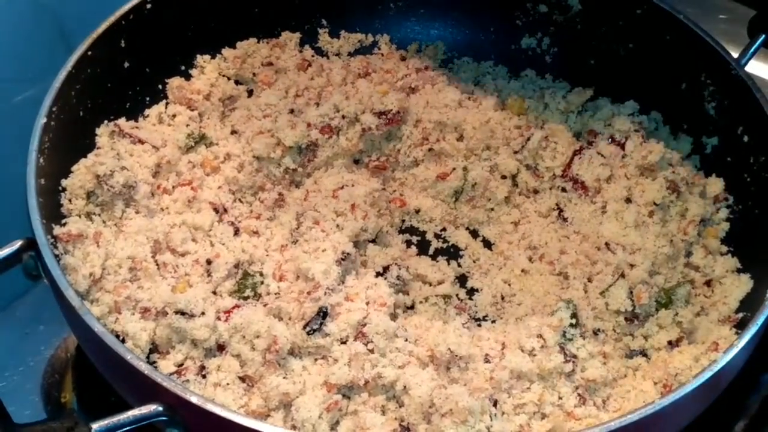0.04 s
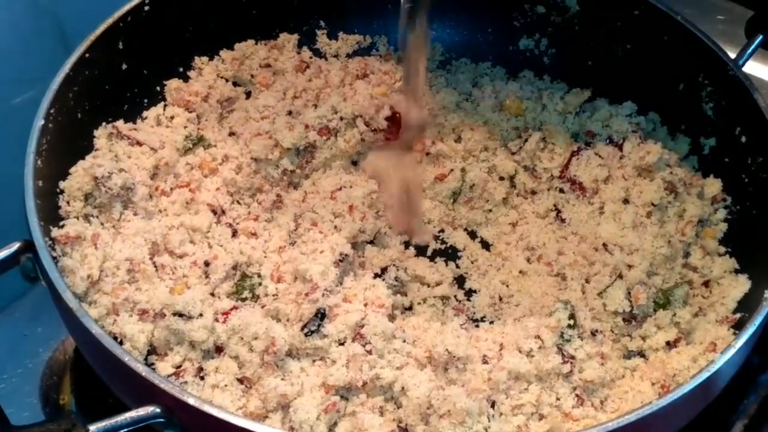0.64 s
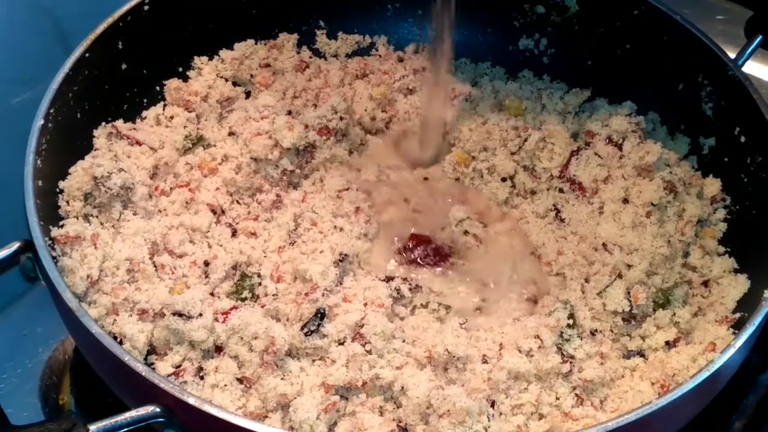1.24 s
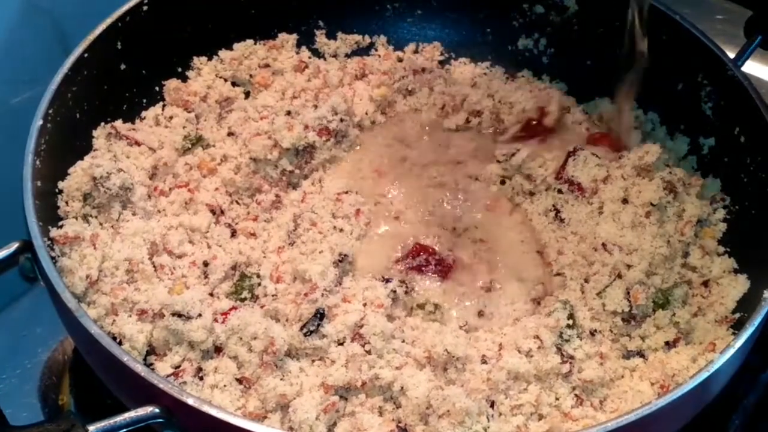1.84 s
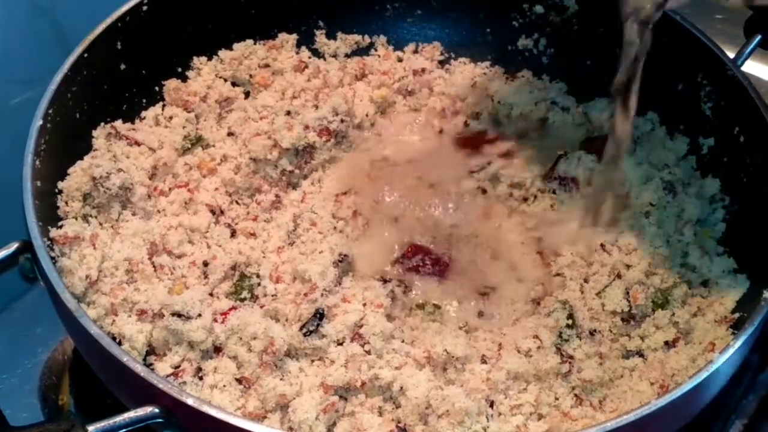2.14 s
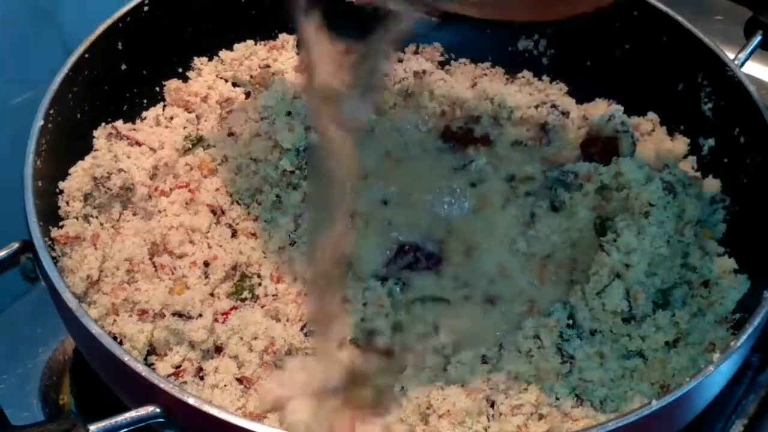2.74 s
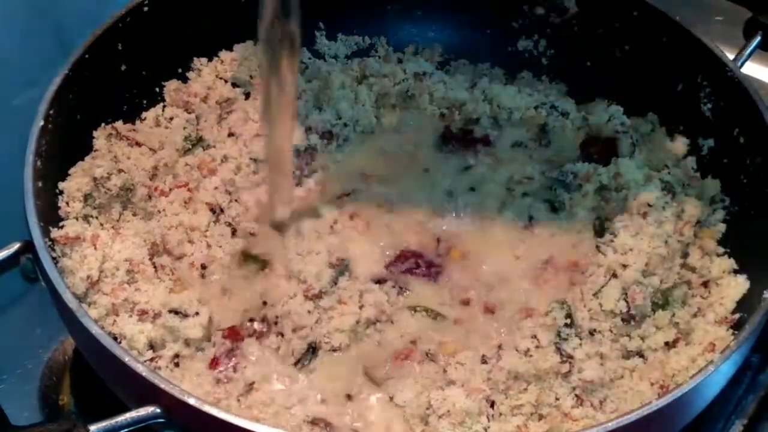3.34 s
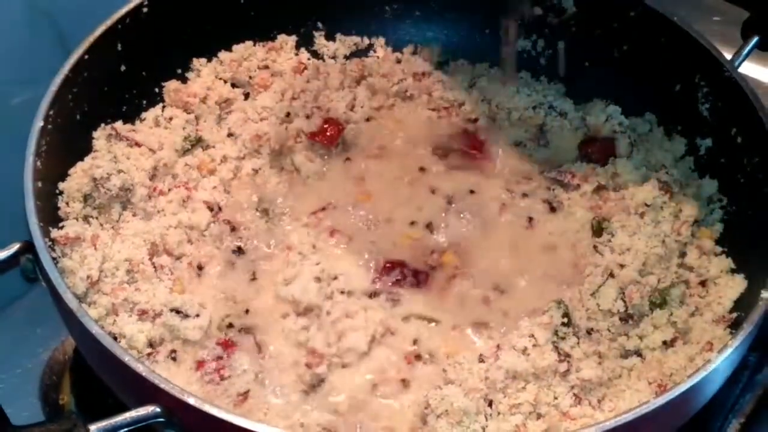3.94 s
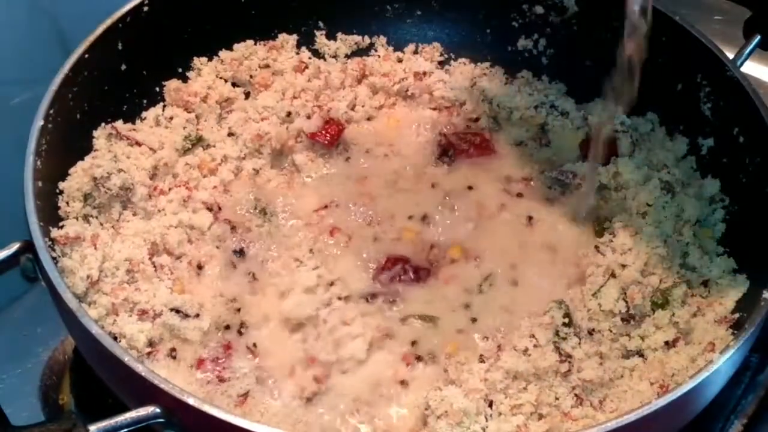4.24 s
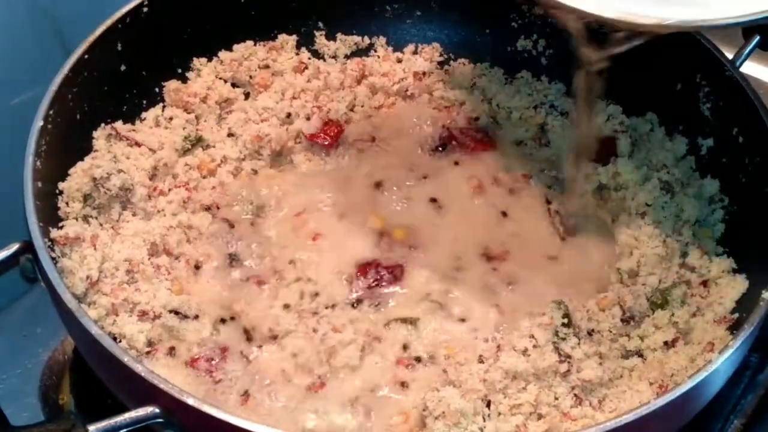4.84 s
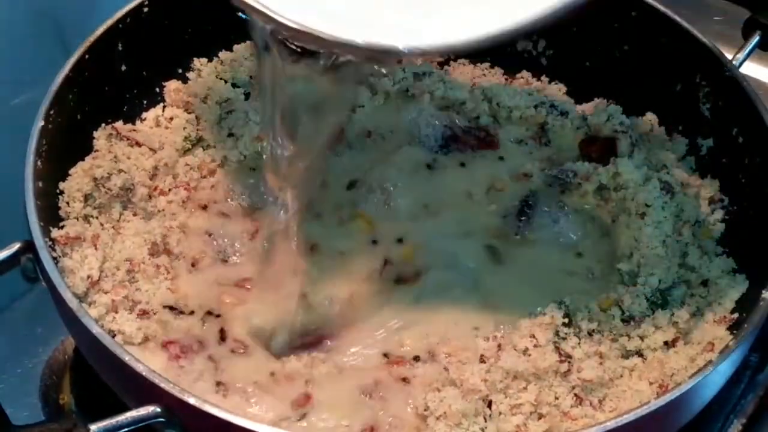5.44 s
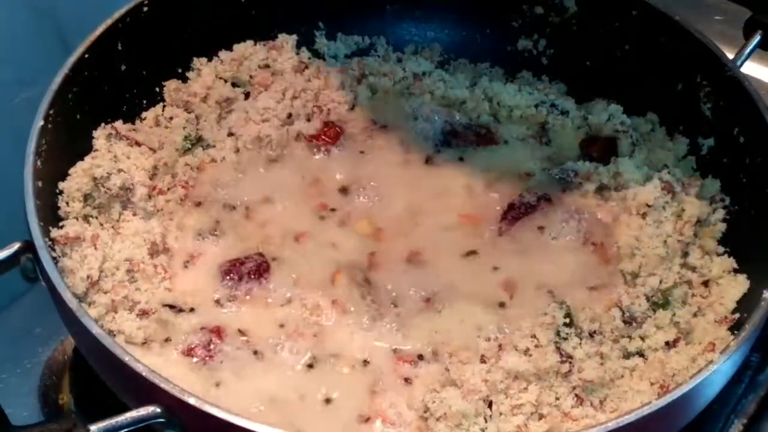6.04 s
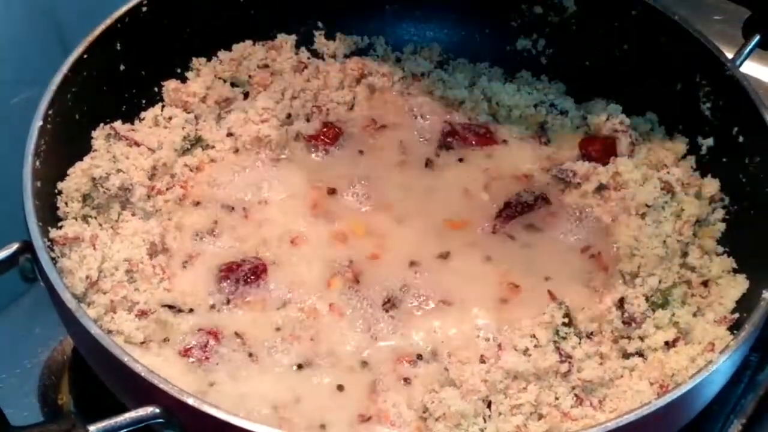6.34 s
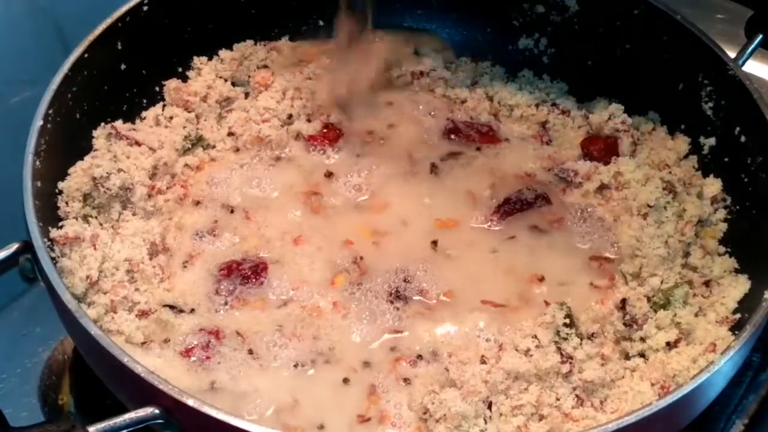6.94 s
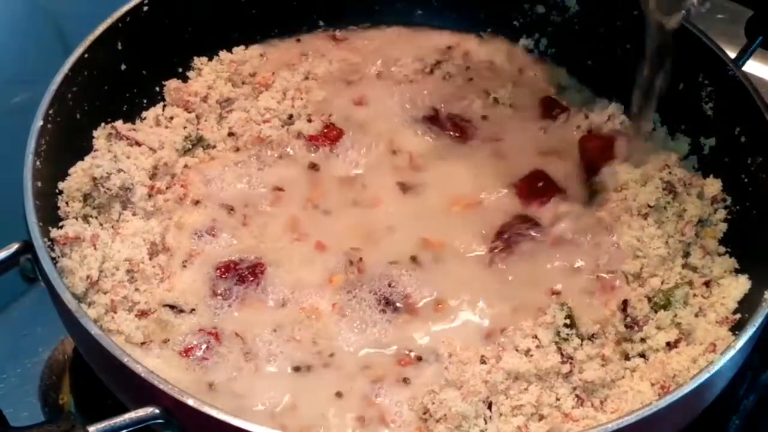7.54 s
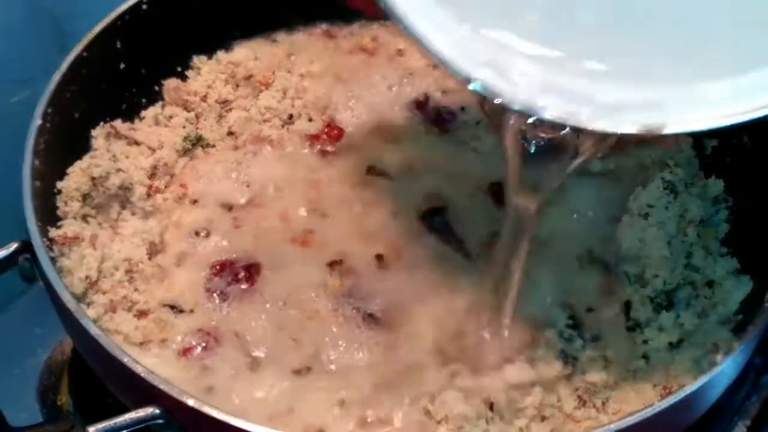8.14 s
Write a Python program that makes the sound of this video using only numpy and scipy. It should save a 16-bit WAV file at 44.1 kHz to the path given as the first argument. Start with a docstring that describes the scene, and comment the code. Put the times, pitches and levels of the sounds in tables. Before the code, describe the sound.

Water hits roasted grains in a hot pan and flashes into a loud, bright hiss. Coarser frying crackles and spits underneath, surging as the stream reaches fresh hot patches. The water splashes and gurgles more as a pool forms. Late on, metal knocks once on the pan and rings briefly while the sizzle carries on. Soft thuds and faint stove noise lie beneath, all heard by one close microphone in a kitchen.

```python
"""Water flashes into a bright hiss as a wandering stream is poured over roasted grains in a hot pan.
Tiny steam bursts merge into the hiss; coarser ones fry and spit, surging at each fresh hot patch.
The stream splashes, and gurgles more as a pool forms. Late on, metal knocks once on the pan and rings.
Underneath are soft thuds, a faint rustle and the kitchen stove. One close microphone."""
import sys
import numpy as np
from scipy import signal
from scipy.fft import rfft, irfft, next_fast_len
from scipy.io import wavfile
from scipy.ndimage import map_coordinates

SR = 44100
rng = np.random.default_rng(int(sys.argv[2]) if len(sys.argv) > 2 else 0)


def store_pcm(level_fs):
    """Save levels as 16-bit WAV."""
    pcm = np.round(np.clip(level_fs, -1, 1) * 32767).astype(np.int16)
    wavfile.write(sys.argv[1], SR, np.atleast_2d(pcm).T)


N = 361619
TIME = np.arange(N) / SR


def from_db(db):
    """Decibels to gain."""
    return 10 ** (np.asarray(db) / 20)


def unit_rms(x):
    """Scale to unit power."""
    return x / np.sqrt(np.mean(x ** 2) + 1e-20)


def curve(rows):
    """Rows of (seconds, value) joined by straight lines."""
    return np.interp(TIME, *np.transpose(rows))


def colour(x, spectrum):
    """Filter by (Hz, dB) points on a log-frequency axis; unit power."""
    hz, db = np.transpose(spectrum)
    size = next_fast_len(N + 4096)
    bins_hz = np.maximum(np.arange(size // 2 + 1) * SR / size, 1)
    low_cut = np.minimum(bins_hz / hz[0], 1) ** 2
    gain = from_db(np.interp(np.log(bins_hz), np.log(hz), db))
    return unit_rms(irfft(rfft(x, size) * low_cut * gain, size)[:N])


def band(x, low_hz, high_hz, order=2):
    """Band-pass; unit power."""
    high_hz = np.clip(high_hz, 40, .45 * SR)
    low_hz = np.clip(low_hz, 10, .97 * high_hz)
    sos = signal.butter(order, [low_hz, high_hz], "band", fs=SR, output="sos")
    return unit_rms(signal.sosfilt(sos, x))


def resonate(x, hz, width_hz):
    """Two-pole resonance, unity peak gain."""
    r = np.exp(-np.pi * width_hz / SR)
    feedback = [1, -2 * r * np.cos(2 * np.pi * hz / SR), r * r]
    return signal.lfilter(np.array([1, 0, -1]) * (1 - r * r) / 2, feedback, x + 1e-18)


def drift(rate_hz):
    """Slow random wander, unit RMS."""
    hop, settle = 40, 2000
    r = np.exp(-2 * np.pi * hop * rate_hz / SR)
    noise = rng.standard_normal(N // hop + settle + 2)
    slow = signal.lfilter([1], [1, -2 * r, r * r], noise)[settle:]
    return np.interp(np.arange(N) / hop, np.arange(len(slow)), unit_rms(slow))


def envelope(start_s, t60_s, swell_s):
    """Exponential swell and decay."""
    out, first = np.zeros(N), int(start_s * SR)
    age_s = TIME[:min(N - first, int(2 * t60_s * SR))]
    out[first:first + len(age_s)] = (1 - np.exp(-age_s / swell_s)) * from_db(-60 * age_s / t60_s)
    return out


def tone(start_s, hz, t60_s, swell_s, rise_per_s=0):
    """Decaying sine; the pitch climbs by rise_per_s times hz each second."""
    out = envelope(start_s, t60_s, swell_s)
    live = out > 0
    age_s = TIME[live] - start_s
    out[live] *= np.sin(2 * np.pi * hz * age_s * (1 + rise_per_s * age_s / 2))
    return out


def pops(per_s, spread_db):
    """Random clicks; a few stand out if spread_db is positive, or fall back if negative. Unit power."""
    sizes = from_db(spread_db * np.minimum(rng.exponential(1, N), 5))
    return unit_rms(sizes * rng.choice([-1, 1], N) * (rng.random(N) < per_s / SR))


# Each row: frequency in Hz, level in dB.
STOVE_SPECTRUM = [(25, -22), (55, -12), (110, -1.5), (180, -7), (300, -4), (550, -18), (950, -14.5),
                  (1500, -23), (2200, -20), (6500, -31), (9000, -28), (12000, -17), (15000, -32)]

def stove():
    """Faint, slightly wavering stove noise."""
    return from_db(-71 + 0.94 * drift(12)) * colour(rng.standard_normal(N), STOVE_SPECTRUM)


def kitchen(x, t60_s, wet_db):
    """Hard walls close by add a short diffuse tail."""
    tail = (rng.standard_normal(N) * envelope(0.0031, t60_s, swell_s=0.0034))[:SR // 2]
    tail /= np.sqrt(np.sum(tail ** 2))
    return x + from_db(wet_db) * signal.fftconvolve(x, tail)[:N]


def rustle(peak_s=0.39, width_s=0.12):
    """Faint handling before the pour."""
    swell = np.exp(-((TIME - peak_s) / width_s) ** 2)
    return from_db(-76) * swell * band(rng.standard_normal(N), 800, 2100, order=1)


# Each row: start in seconds, level in dB.
THUD_HITS = [(0.27, -54), (0.36, -54), (0.55, -56), (0.89, -38), (1.195, -49), (1.65, -45), (1.96, -45),
             (2.2, -50), (2.41, -44), (2.465, -38), (3.96, -46), (4.05, -43), (6.52, -43)]

def thuds():
    """Dull bumps from handling and from water landing."""
    gain = sum(from_db(db) * envelope(start_s, t60_s=0.21, swell_s=0.008) for start_s, db in THUD_HITS)
    return gain * band(rng.standard_normal(N), 70, 148)


# Each row: frequency in Hz, level in dB, then T60, lag and swell in seconds.
METAL_MODES = [(485, -15, .08, 0, .001), (503, -5.5, .3, .001, .009), (563, -21, .16, 0, .001),
               (662, -19, .15, 0, .001), (720, -25, .2, 0, .001), (856, -12, .23, .003, .008),
               (909, -19, .44, .003, .001), (995, -22, .25, .003, .001), (1035, -24, .27, .003, .001),
               (1240, -13, .05, 0, .001), (1443, -21, .3, .004, .01), (1613, -15, .16, .008, .012),
               (1683, -20, .19, 0, .001), (2704, 0, .115, .011, .015), (3105, -15, .12, .012, .003),
               (5196, -26, .28, 0, .001), (5875, -2, .085, 0, .007), (6404, -15, .11, .002, .006),
               (7877, -22, .17, .001, .005)]
# Each row: start in seconds, level in dB, T60 in seconds.
CHATTER_HITS = [(6.653, -12.5, 0.065), (6.659, -15.5, 0.18), (6.683, -23, 0.3)]
# Each row: frequency in Hz, level in dB.
CHATTER_SPECTRUM = [(50, -14), (130, 1), (330, -3), (600, 6.5), (1100, 2), (2200, -2.5), (3300, 0.5),
                    (4400, -7), (5600, 0), (8500, -3.5), (13000, -13)]

def knock(start_s=6.652):
    """Metal meets the pan, chatters and rings; some modes take up the energy late."""
    ringing = sum(from_db(db) * tone(start_s + lag_s, hz, t60_s, swell_s)
                  for hz, db, t60_s, lag_s, swell_s in METAL_MODES)
    ringing *= from_db(0.67 * drift(45))
    contact = sum(from_db(db) * envelope(hit_s, t60_s, swell_s=.001) for hit_s, db, t60_s in CHATTER_HITS)
    return ringing + contact * colour(rng.standard_normal(N), CHATTER_SPECTRUM)


# Each row: frequency in Hz, width in Hz, gain in dB.
BOWL_MODES = [(627, 37, 4), (822, 42, -1), (1008, 34, 5.5), (1250, 72, 1.5), (2077, 210, -3.5),
              (3080, 160, -18.5)]

def bowl(x):
    """Air in the hollow of the pan resonates; unit power."""
    return unit_rms(x + sum(from_db(db) * resonate(x, hz, width_hz) for hz, width_hz, db in BOWL_MODES))


def wetting(build_s, lands_s=0.7235):
    """Gain: zero until the water lands, then building to one."""
    return from_db(np.interp(TIME, [lands_s, lands_s + build_s], [-33, 0], left=-np.inf))


def bubbles(per_s, low_hz, high_hz, cycles, sizes=20):
    """Each bubble rings briefly at a pitch set by its size; unit power."""
    clicks = pops(per_s, spread_db=4.5)
    size = rng.integers(0, sizes, N)
    pitches_hz = np.geomspace(low_hz, high_hz, sizes)
    rings = (resonate(clicks * (size == k), hz, 2 * hz / cycles) for k, hz in enumerate(pitches_hz))
    return unit_rms(sum(rings))


# Each row: start in seconds, initial pitch in Hz, level in dB.
BIG_BUBBLES = [(4.822, 344, -28), (4.878, 222, -34.5), (5.058, 1176, -33), (5.615, 353, -36),
               (6.18, 294, -34.5), (7.564, 1250, -29.5), (8.083, 1290, -24.5)]

def glugs():
    """A big bubble's pitch climbs as it nears the surface."""
    return sum(from_db(db) * tone(start_s, hz, t60_s=0.095, swell_s=0.0029, rise_per_s=2.5)
               for start_s, hz, db in BIG_BUBBLES)


def gurgle(pool_forms_s=2.8, pool_full_s=4.58):
    """The grains soak up the first water; then a pool gathers, heaves unevenly and bubbles."""
    gain = wetting(build_s=0.016) * from_db(curve([(pool_forms_s, -66.5), (pool_full_s, -54)]))
    churn = from_db(2.5 + 2 * drift(10.5)) * pool_noise()
    small_glugs = from_db(-8) * bubbles(per_s=30, low_hz=200, high_hz=480, cycles=18)
    return gain * (churn + small_glugs)


# Each row: frequency in Hz, level in dB.
POOL_SPECTRUM = [(25, -11), (55, -5.5), (100, 2.5), (160, -0.5), (300, -1), (450, -4), (700, -15.5),
                 (1500, -35)]

def pool_noise():
    """Low rumble of the stream churning the pool; unit power."""
    return colour(pops(per_s=900, spread_db=2.5), POOL_SPECTRUM)


# Force of the stream in two pours. Each row: time in seconds, relative level in dB.
FIRST_STREAM = [(0.98, -55.5), (1.26, -49), (2.11, -55), (2.14, -61.5), (3.12, -60), (3.25, -54),
                (3.66, -56), (3.92, -51), (4.03, -56), (5.1, -50.5), (6.6, -55)]
SECOND_STREAM = [(7.02, -49), (7.064, -54.5), (8.05, -51)]
# Each row: frequency in Hz, level in dB.
SPLASH_SPECTRUM = [(250, -14.5), (520, -12), (700, -1), (1000, -1.5), (1300, -2), (1700, -1), (3000, -19.5)]

def splash():
    """The stream breaks into drops and traps small bubbles."""
    gain = wetting(build_s=0.17) * from_db(curve(np.vstack([FIRST_STREAM, SECOND_STREAM])))
    drops = pops(per_s=7000, spread_db=2.5)
    trapped = from_db(-12) * bubbles(per_s=820, low_hz=540, high_hz=2400, cycles=21)
    flutter = from_db(2.5 + 1.36 * drift(12.5))
    return gain * flutter * colour(bowl(drops + trapped), SPLASH_SPECTRUM)


# Each row: start in seconds, level in dB, centre in Hz, width in octaves, T60 in seconds.
SPLAT_HITS = [(0.889, -20.5, 1600, 4.1, .09), (3.18, -38.5, 1980, 1.6, .25),
              (3.52, -34.5, 2400, 0.68, 0.37), (5.06, -34.5, 1160, 0.56, 0.11),
              (6.655, -20.5, 8740, 0.23, 0.64), (6.912, -27.5, 2880, 0.51, 0.18),
              (7.564, -31.5, 1710, 0.61, 0.14), (7.85, -30.5, 5300, .4, .1), (8.03, -27.5, 3600, 1.8, 0.18)]

def splats():
    """Lumps of water burst on the hot metal in a short spray."""
    spray, out = pops(per_s=12000, spread_db=1.5), np.zeros(N)
    for start_s, db, hz, octaves, t60_s in SPLAT_HITS:
        edge = 2 ** (octaves / 2)
        out += from_db(db) * envelope(start_s, t60_s, swell_s=0.0011) * band(spray, hz / edge, hz * edge)
    return out


# Each row: start in seconds, length in seconds, centre in Hz, width in octaves, peak level in dB.
NARROW_FLARES = [(0.78, 0.49, 4450, 0.68, -34), (1.1, 0.82, 636, 0.17, -53),
                 (1.978, 0.63, 1308, .28, -47.5), (2.396, 0.51, 6200, .6, -37),
                 (2.893, 0.57, 6160, 0.58, -32.5), (2.961, .16, 11030, 0.33, -21),
                 (3.36, .17, 8270, .45, -31.5), (3.42, .3, 5520, .22, -39), (4.78, .14, 6850, 0.37, -34.5),
                 (4.85, 0.32, 2860, .47, -41), (5.35, 0.8, 2150, .3, -47.5),
                 (6.868, 0.97, 2700, 0.51, -39.5)]

def flares(rise_share=0.23):
    """Narrow bands of hiss swell and die away."""
    fizz, out = pops(per_s=14000, spread_db=2.5), np.zeros(N)
    for start_s, length_s, hz, octaves, db in NARROW_FLARES:
        power = np.interp((TIME - start_s) / length_s, [0, rise_share, 1], [0, 1, 0])
        edge = 2 ** (octaves / 2)
        out += from_db(db) * np.sqrt(power) * band(fizz, hz / edge, hz * edge, order=6)
    return out


def near_echo(x, delay_s, wander_s, echo_db):
    """Metal close above the pan throws the sound back; the path changes as the stream moves."""
    echo = map_coordinates(x, [(TIME - delay_s - wander_s * drift(.3)) * SR], order=3)
    return (x + from_db(echo_db) * echo) / np.hypot(1, from_db(echo_db))


# Steady boiling on the wetted metal. Each row: time in seconds, relative hiss level in dB.
SIMMER_LEVELS = [(0.74, -26.5), (1.65, -26), (2.74, -22), (2.8, -35.5), (2.9, -33.5), (3.2, -31.5),
                 (4.25, -31.5), (4.62, -28.5), (5.0, -26), (6.6, -26), (7.0, -23), (8.2, -23)]
# Each row: start, rise and hold in seconds, then hiss and fry in dB relative to their simmer levels.
BOIL_SURGES = [(0.73, .22, 0.023, 16, 10.5), (1.222, 0.073, .14, 6, 0), (2.408, .015, 0.23, 3, 3.5),
               (2.908, 0.012, .12, 5.5, 0.5), (3.16, .02, 0.022, -10, 7.5), (3.35, 0.015, .13, 3.5, 1),
               (4.7, 0.11, 0.12, 0, 4.5), (5.05, 0.013, 0.0089, -12, 1.5), (5.705, 0.0078, .005, -2, -6),
               (5.92, 0.016, .005, -1, -1), (6.7, .17, 0.037, 5.5, 1.5), (7.17, 0.036, 0.037, -2.5, -9),
               (7.45, 0.076, 0.077, 1.5, 1.5), (7.69, .015, .01, -2, -8), (7.96, 0.036, 0.027, 4.5, 3.5)]

def boiling(cooling_t60_s=0.82, usual_simmer_db=-26, fry_follows=0.61):
    """Hiss and fry gains: the simmer surges as the stream reaches a fresh hot patch, which then cools."""
    hiss_power, fry_power = 1, 1
    for start_s, rise_s, hold_s, hiss_db, fry_db in BOIL_SURGES:
        cooling_s = np.maximum(TIME - start_s - rise_s - hold_s, 0)
        surge = np.clip((TIME - start_s) / rise_s, 0, 1) * from_db(-60 * cooling_s / cooling_t60_s)
        hiss_power += (from_db(hiss_db) * surge) ** 2
        fry_power += (from_db(fry_db) * surge) ** 2
    simmer_db = curve(SIMMER_LEVELS)
    fry_simmer_db = -40 + fry_follows * (simmer_db - usual_simmer_db)
    hiss_gain = wetting(build_s=0.016) * from_db(simmer_db) * np.sqrt(hiss_power)
    fry_gain = wetting(build_s=0.17) * from_db(fry_simmer_db) * np.sqrt(fry_power)
    return hiss_gain, fry_gain


# Each row: frequency in Hz, level in dB.
FRY_SPECTRUM = [(500, -37), (1000, -18.5), (1300, -7), (1750, -5), (2100, -0.5), (3100, 2), (4600, 1),
                (6500, -5), (9000, -3.5), (15000, -7.5)]

def fry(gain):
    """Coarse bursts crackle between the grains."""
    crackle = bowl(pops(per_s=9000, spread_db=2.0))
    flutter = from_db(2 + drift(23))
    return gain * flutter * colour(crackle, FRY_SPECTRUM)


# Each row: frequency in Hz, level in dB.
STEAM_SPECTRUM = [(3000, -30), (6500, -21.5), (8200, -16), (9600, -9), (11000, -3), (12300, 1.5),
                  (13500, -2), (15400, -11.5)]

def steam(gain):
    """Countless tiny bursts merge into a hiss, with sparser spits among them."""
    hiss = pops(per_s=26000, spread_db=2.5)
    spits = from_db(-14.5) * pops(per_s=450, spread_db=-1.0)
    flutter = from_db(0.4 + 0.68 * drift(18))
    return gain * flutter * colour(hiss + spits, STEAM_SPECTRUM)


def scene():
    """Pan and stove, identical in both channels."""
    hiss_gain, fry_gain = boiling()
    frying = near_echo(fry(fry_gain), delay_s=.004, wander_s=0.0004, echo_db=-11)
    pan = steam(hiss_gain) + frying + flares() + splash() + gurgle()
    pan += splats() + glugs() + thuds() + rustle()
    return np.tile(stove() + kitchen(pan, t60_s=.15, wet_db=-13.5) + knock(), (2, 1))


def record(dry):
    """The highest peaks clip; a steep low-pass cuts the top."""
    cutoff_hz = 15550
    low_pass = signal.ellip(14, .1, 100, cutoff_hz, fs=SR, output="sos")
    return signal.sosfilt(low_pass, np.clip(dry, -.92, .92))


dry = scene()
out = record(dry)
store_pcm(out)
```